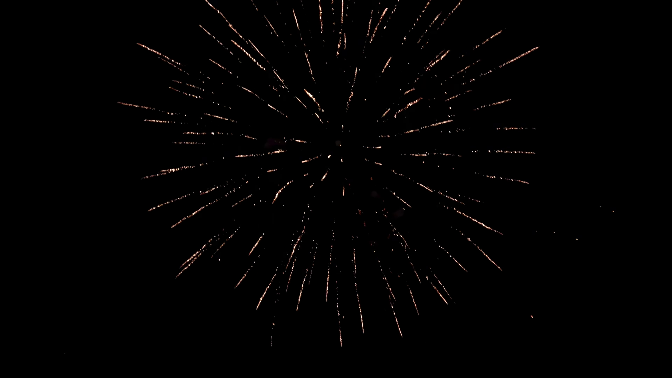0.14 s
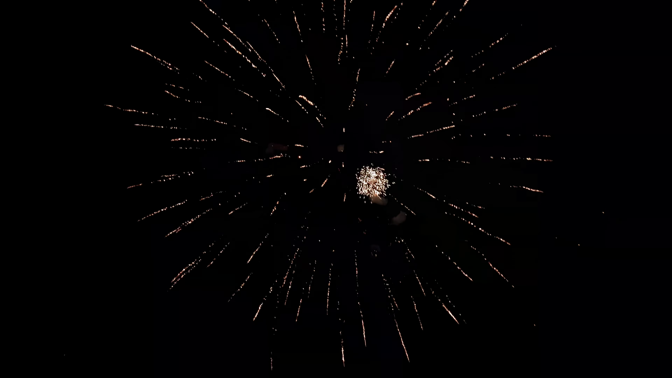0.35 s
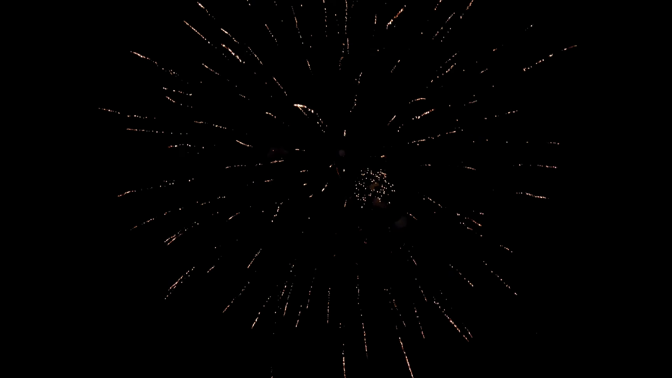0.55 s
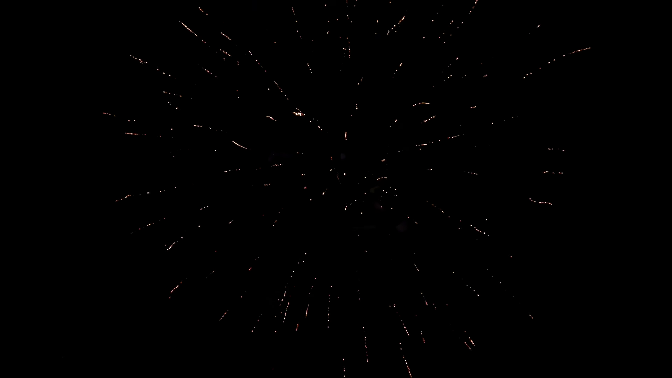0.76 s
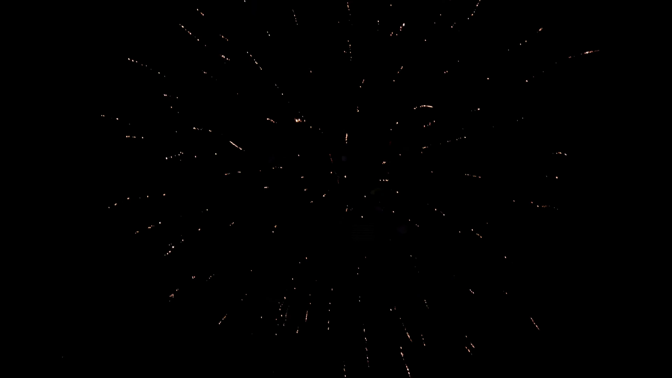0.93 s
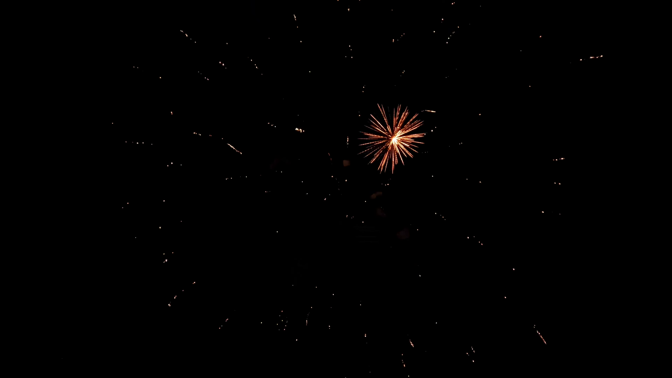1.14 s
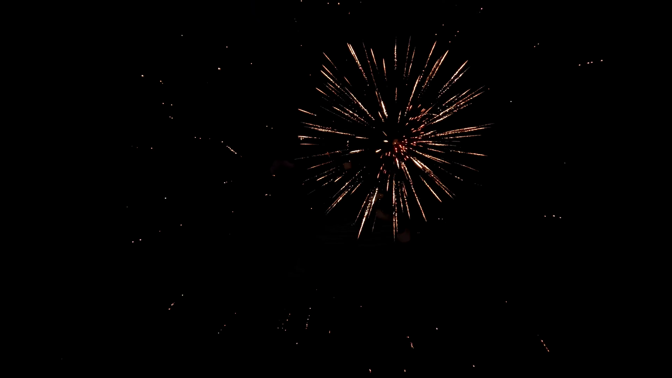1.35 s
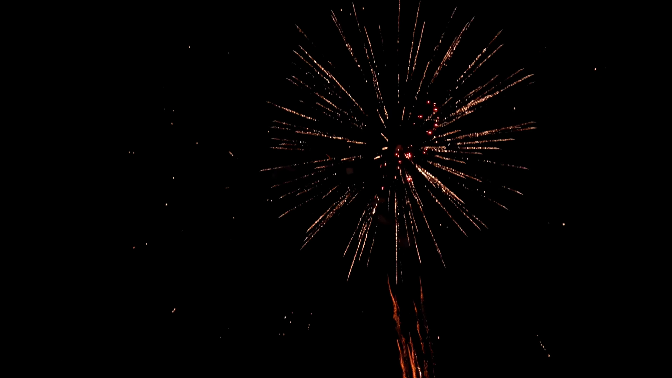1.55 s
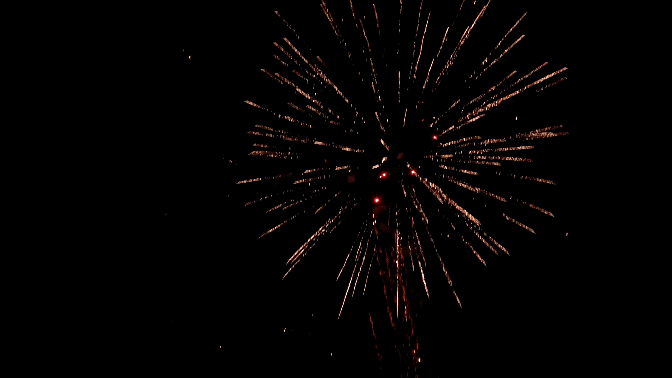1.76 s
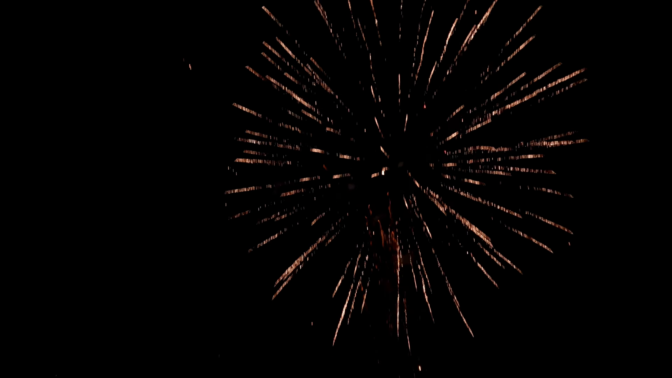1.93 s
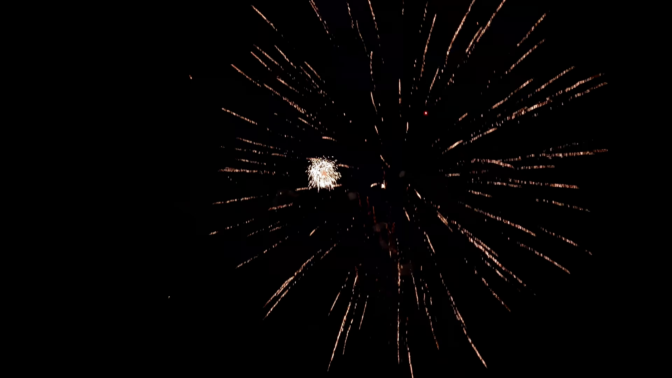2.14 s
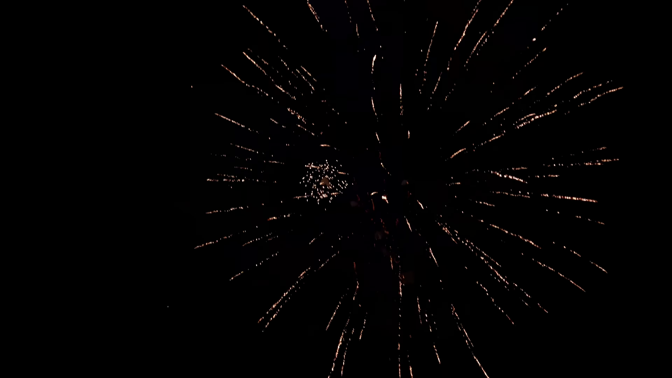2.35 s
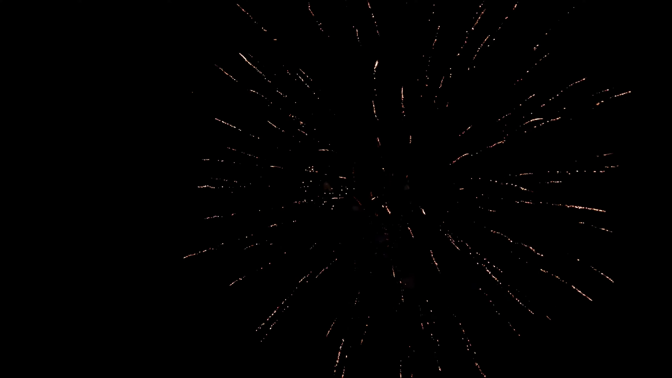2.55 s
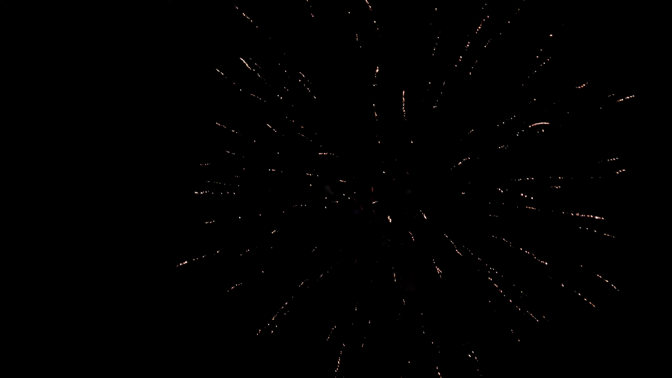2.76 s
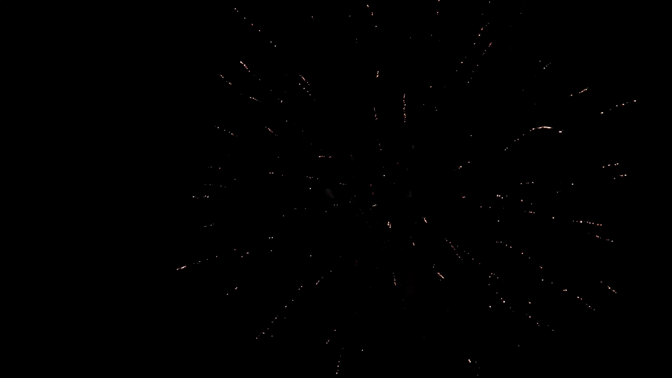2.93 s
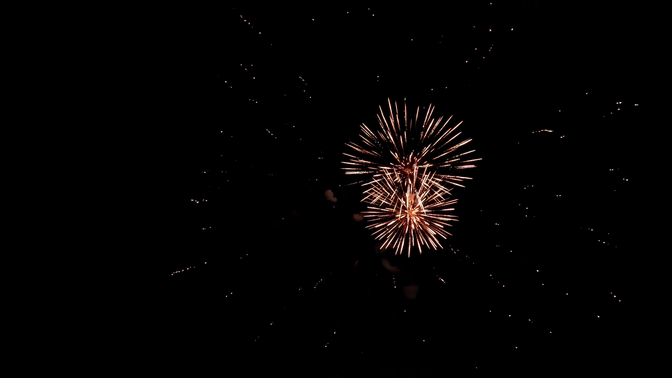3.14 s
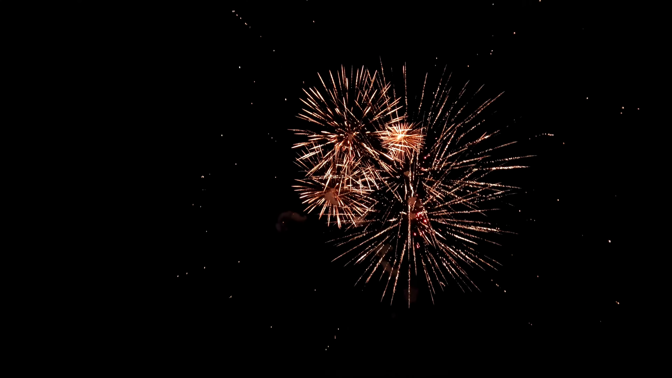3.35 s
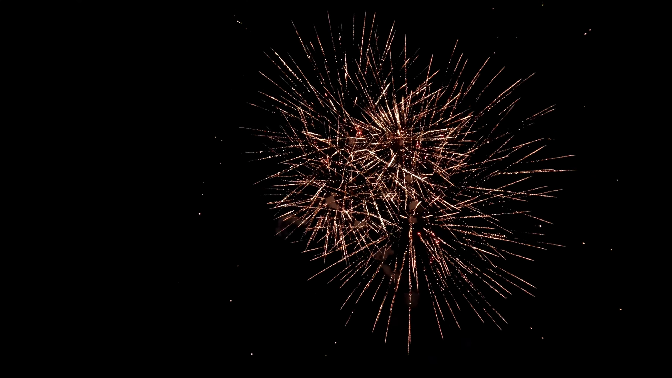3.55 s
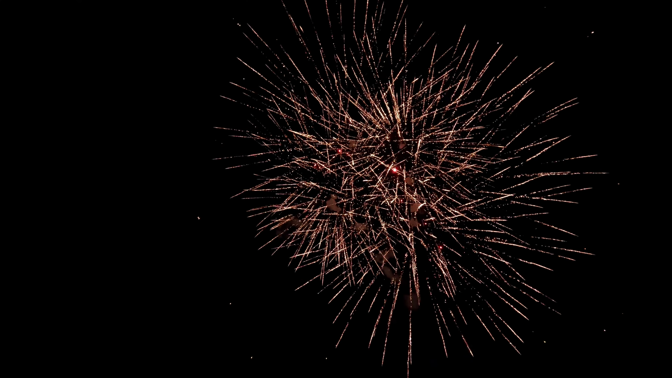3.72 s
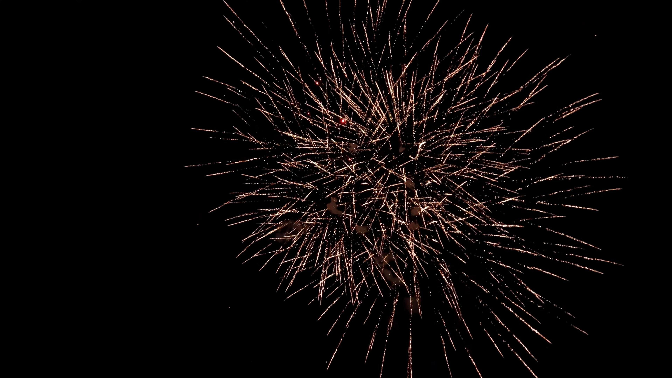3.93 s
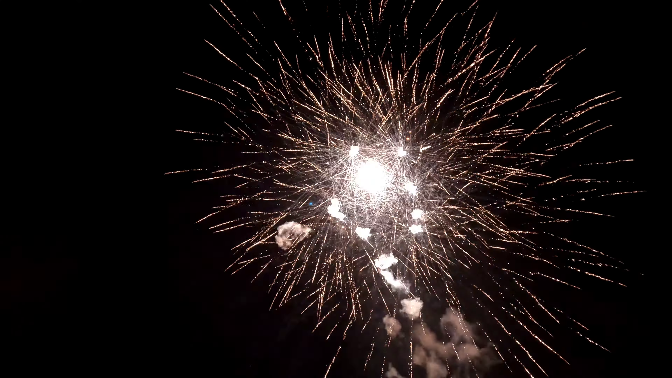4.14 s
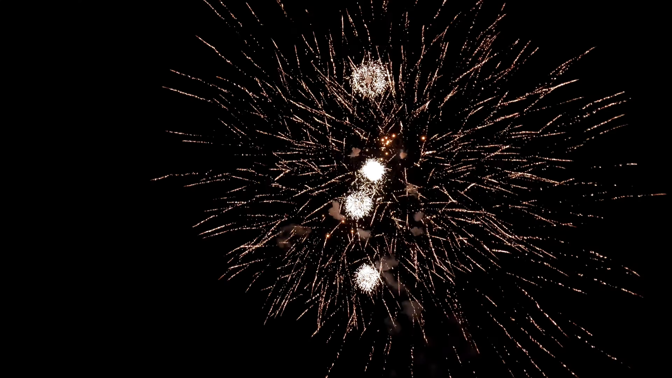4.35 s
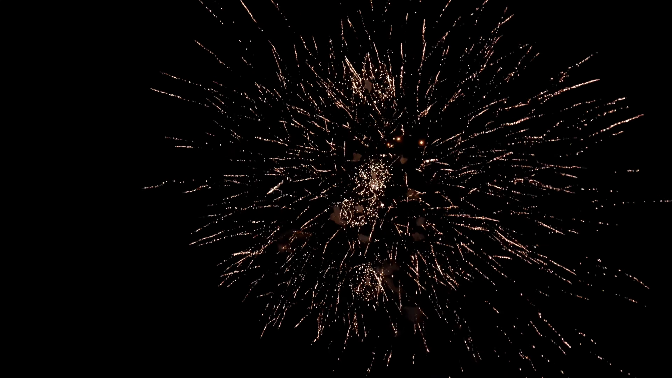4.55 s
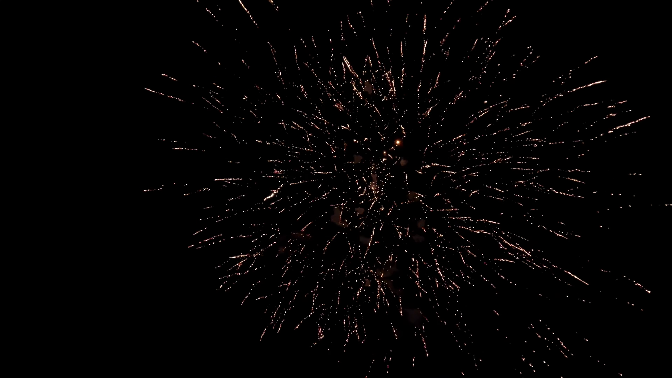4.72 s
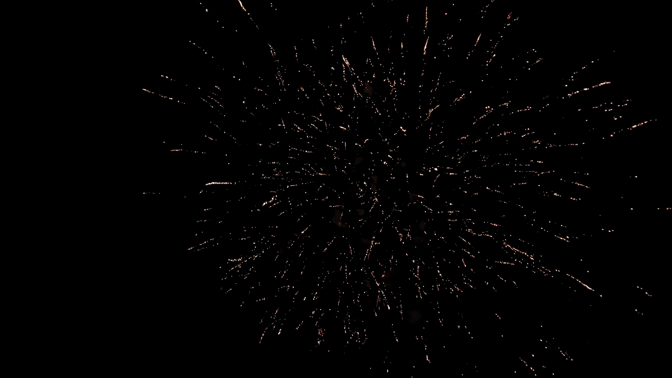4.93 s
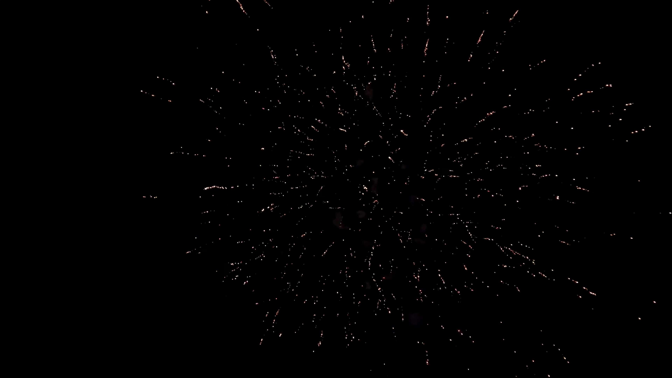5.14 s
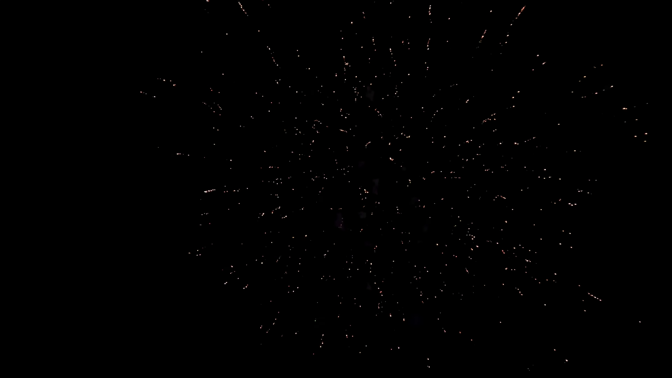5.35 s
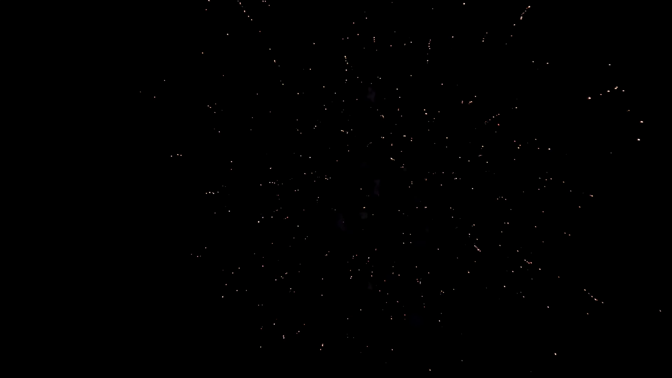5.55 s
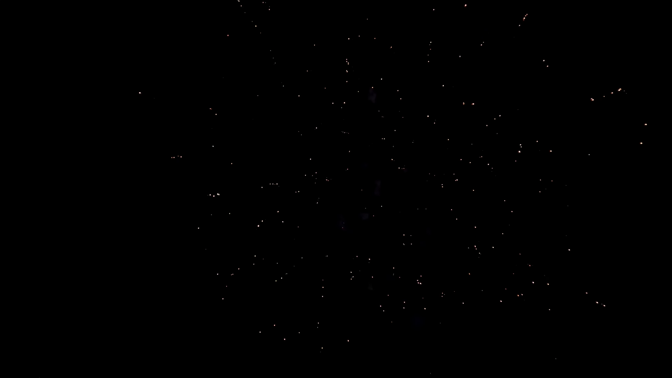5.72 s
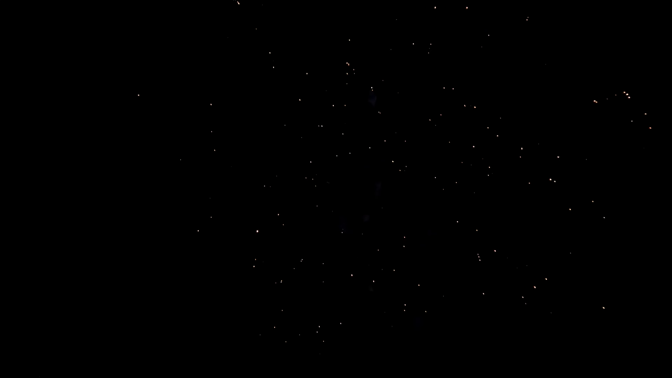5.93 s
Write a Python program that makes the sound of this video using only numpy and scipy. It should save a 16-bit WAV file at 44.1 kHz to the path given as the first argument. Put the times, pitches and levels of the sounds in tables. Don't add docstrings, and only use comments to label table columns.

```python
import sys
import numpy as np
from scipy import signal
from scipy.fft import rfft, irfft
from scipy.io import wavfile
from scipy.ndimage import uniform_filter1d, minimum_filter1d

SR = 44100
rng = np.random.default_rng(int(sys.argv[2]) if len(sys.argv) > 2 else 0)


def master_out(mix):
    frames = np.transpose(np.atleast_2d(mix))
    ceiling = np.clip(frames, -1, 1)
    pcm = np.round(ceiling * 32767).astype(np.int16)
    wavfile.write(sys.argv[1], SR, pcm)


def rack_gain(trim_db):
    fader = np.asarray(trim_db, float)
    return 10 ** (fader / 20)


N = 263894

# (time [s], blast level [dB], crack level [dB], size [factor], ground echo [dB])
SHELL_BURSTS = [(.6260, -4.5, 5.5, 1.04, -1), (1.5029, -5, -3, 1.03, 5.5), (1.5339, -8, 2.5, 1.18, -14),
                (2.4413, -2, -1.5, 1.024, 0), (3.3924, -1.5, -3, 0.85, -0.3), (3.449, -3.5, -8, 1.08, 0.5),
                (3.6310, -1, -12, 0.85, .1), (3.6773, -5.5, -3.5, 0.97, 4.5), (3.7316, -4, -23, 0.85, 3),
                (4.612, -1.5, -7.5, 0.93, 0), (4.617, -14.5, 14, 0.93, 12), (4.6914, -5.5, -9, 1.27, 5.5),
                (4.7560, -3.5, -19, 1.19, -9), (4.7618, -9.5, -5, 1.51, 4.5)]
# (time [s], thump level [dB], gas jet level [dB], jet lead [ms], wall echo [dB])
LIFT_CHARGES = [
    (1.4092, -8.5, -40, 3.1, -1),
    (1.4248, 0.5, -11.5, 6.9, -5),
    (1.4737, -2.5, -15.5, 1.1, -1),
    (1.533, -6.5, -18, 1.1, -0.5),
    (1.5847, -4, -15.5, 2.7, -0.5),
    (1.6334, -3, -16.5, 1.8, -1),
]
# (time [s], peak level [dB], treble re peak [dB], ring [Hz])
DISTANT_THUDS = [(0.048, -28.5, -30, 255), (0.496, -26.5, -26, 165), (0.79, -26, 0.5, 242),
                 (0.913, -19.5, -44, 223.5), (1.03, -25.5, -6, 222), (1.671, -18, -13, 167.5),
                 (2.474, -12, -11, 179), (2.49, -15, -18, 181), (2.51, -15, -15, 164),
                 (2.565, -19, -10, 185), (2.622, -20, -0.5, 227), (2.751, -28, -30, 226),
                 (2.937, -26.5, -38, 236), (2.987, -35, 3, 275), (3.044, -30.5, -5, 166),
                 (3.263, -25.5, -26, 188), (3.481, -16, -12, 220), (3.509, -13.5, -32, 182),
                 (3.599, -21, -2.5, 215), (3.848, -20.5, -7, 296), (3.883, -21.5, -7, 340),
                 (4.144, -27, -18, 246), (4.713, -15, -2, 203), (4.732, -19, -5, 200),
                 (4.786, -15.5, -9, 190), (5.308, -32.5, -21, 221), (5.531, -28, -9.5, 200),
                 (5.602, -34, -5, 152), (5.691, -31.5, -20, 153)]
# (time [s], peak level [dB], treble re peak [dB], ring [Hz])
FAR_TICKS = [(5.478, -34.5, -7, 2080), (5.824, -24, -31, 197), (5.825, -28.5, -28, 413),
             (5.843, -23.5, -34, 190), (5.884, -26, -26, 180), (5.886, -28, -29, 417),
             (5.918, -21, -14, 412), (5.933, -18.5, -19, 183), (5.937, -21, -29, 400),
             (5.944, -21, -25, 198), (5.963, -25, -12, 169), (5.981, -33, 0, 700)]
# (time [s], rumble level [dB], hiss level [dB], near yards [dB], far hills [dB])
SURROUNDINGS = [(-.4, -31.5, -37.5, 0, -7), (0.628, -27, -35, -1, -8), (1.424, -30, -34, 4, -24),
                (1.474, -29, -37, 5, -24), (1.533, -32, -38.5, 5, -24), (1.585, -33, -40, 8, -24),
                (1.632, -34, -42, 7, -22), (2.44, -27.5, -34.3, 0, -8), (3.393, -32, -41, 0, -8.5),
                (3.45, -30.5, -40.5, 2, -9), (3.63, -35.5, -42, -5, -7), (3.678, -34, -40.5, -3, -5.5),
                (3.731, -33.5, -38.5, -4, -5), (4.614, -31.5, -36, 1, -7.5), (4.691, -31.5, -41, 5, -7),
                (4.76, -29.5, -39.5, 7, -7)]
# (time [s], rumble level [dB], hiss level [dB], near yards [dB], far hills [dB])
FAR_ROLL = [
    (5.5, -41, -46, 0, -8),
    (5.8, -33, -46, 0, -8),
]
# (frequency [Hz], density [dB per Hz])
RUMBLE_SPECTRUM = [(18, -61), (30, -49.5), (71, -12), (227, 0.5), (290, -5.5), (468, -10.5), (513, -11.5),
                   (791, -33), (1200, -22.5), (1560, -52), (2640, -120)]
# (frequency [Hz], density [dB per Hz])
HISS_SPECTRUM = [(350, -13.5), (600, 1), (800, -3), (1340, -6.5), (1530, -4), (3400, -8), (4600, -14),
                 (5300, -20), (7900, -29.5), (9000, -40), (9600, -64), (10600, -38), (11400, -46),
                 (15000, -57)]
# (frequency [Hz], density [dB per Hz])
JET_SPECTRUM = [(600, 2), (1500, -6), (3000, 0), (4500, -7.5), (8000, -20.5), (14000, -37)]
# (frequency [Hz], density [dB per Hz])
LEAD_IN_SPECTRUM = [(100, -16), (300, 1), (700, 5), (2000, -18), (8000, -26.5), (9500, -55)]
# (frequency [Hz], gain [dB])
MICROPHONE_RESPONSE = [(30, -15), (100, -1), (150, 0), (5000, -1), (8000, -2), (9400, -18), (10600, -0.5),
                       (11600, -20), (14500, -8)]
# (frequency [Hz], side re mid [dB])
SIDE_SPECTRUM = [(60, -18), (250, -25), (700, -20), (2000, -18.5), (5000, -18), (9000, -6), (14000, -8)]

BLOCK = 4096
HZ = np.fft.rfftfreq(BLOCK, 1 / SR)
LEAD_IN_LENGTH = 1100
LIFT_LEAD_MS = 15
THUD_LEAD_S = .004
RUMBLE_SHAPE = dict(near_s=.008, near_db=4, near_fade_db=250, peak_s=.14, sharp=3,
                    hills_fade_db=7.5, floor_db=-47)
HISS_SHAPE = dict(near_s=.013, near_db=5, near_fade_db=160, peak_s=.1654, sharp=3,
                  hills_fade_db=7, floor_db=-51.5)
FAR_SHAPE = dict(near_s=0, near_db=-40, near_fade_db=250, peak_s=.16, sharp=2.2,
                 hills_fade_db=8, floor_db=-80)


def evened(x):
    return x / np.sqrt(np.mean(x ** 2) + 1e-20)


def add(mix, s, sound):
    part = mix[round(s * SR):][:len(sound)]
    part += sound[:len(part)]


def coloured(x, points):
    f, db = np.transpose(points)
    hz = np.fft.rfftfreq(len(x), 1 / SR)
    return irfft(rfft(x) * rack_gain(np.interp(np.log(hz + 1), np.log(f), db)), len(x))


def late(ms):
    return np.exp(-2j * np.pi * HZ * ms / 1000)


def dull(hz):
    return 1 / (1 + 1j * HZ / hz)


def answer(starts, levels_db, yards_db, hills_db, near_s, near_db, near_fade_db, peak_s, sharp,
           hills_fade_db, floor_db):
    t = np.arange(0, N + 64, 64) / SR
    age = np.maximum(t[:, None] - starts, 0)
    u = age / peak_s
    near = rack_gain(near_db + yards_db - near_fade_db * (age - near_s)) * (age > near_s)
    swell_power = (u * np.exp(1 - u)) ** sharp
    hills = rack_gain(hills_db - hills_fade_db * age)
    power = near ** 2 + swell_power + np.minimum(u, 1) * hills ** 2
    total = power @ rack_gain(levels_db) ** 2 + rack_gain(floor_db) ** 2
    return np.interp(np.arange(N) / SR, t, np.sqrt(total))


def scattered():
    s, rumble_db, hiss_db, *parts_db = np.transpose(SURROUNDINGS)
    far_s, far_rumble_db, far_hiss_db, *far_parts_db = np.transpose(FAR_ROLL)
    close = answer(s, hiss_db, *parts_db, **HISS_SHAPE)
    distant = answer(far_s, far_hiss_db, *far_parts_db, **FAR_SHAPE)
    rumble = np.hypot(answer(s, rumble_db, *parts_db, **RUMBLE_SHAPE),
                      answer(far_s, far_rumble_db, *far_parts_db, **FAR_SHAPE))

    returns = rng.standard_normal((2, N)) * rack_gain(0.99 * np.minimum(rng.exponential(1, (2, N)), 3))
    lumps = returns[0] * (rng.random(N) < 2500 / SR)
    grains = returns[1] * (rng.random(N) < 16000 / SR)
    flicker = evened(uniform_filter1d(rng.standard_normal(N), 500))
    slow_flicker = evened(uniform_filter1d(flicker, 2200))
    hiss = evened(coloured(grains, HISS_SPECTRUM)) * rack_gain(0.66 * flicker + 0.5 * slow_flicker)

    bright = rack_gain(0.75 + 0.39 * (np.minimum(20 * np.log10(close), -33) + 39))
    top = coloured(hiss, [(1500, -30), (4200, 0)])
    top_gain = np.hypot(close * bright, distant * rack_gain(-12))
    body = np.hypot(close, distant) * (hiss - top)
    return rumble * evened(coloured(lumps, RUMBLE_SPECTRUM)) + body + top_gain * top


def blast(size, top_hz, lag_hz=144, ring_hz=260, ring_q=2.62):
    w = 1j * HZ * size + 1e-9
    lag = ((w - lag_hz) / (w + lag_hz)) ** 4
    ring = w / (w * w + w * ring_hz / ring_q + ring_hz ** 2)
    step = lag * ring * dull(top_hz) * dull(top_hz)
    return step / abs(irfft(step)[60:]).max()


def thud(db, treble_db, hz):
    t = np.arange(BLOCK) / SR
    rattle = evened(coloured(rng.standard_normal(BLOCK), HISS_SPECTRUM))
    rattle = rattle * np.exp(-t / 0.0075) * (1 - np.exp(-t / 0.0034))
    boom = irfft(blast(250 / hz, 2.36 * hz, ring_q=12.3) * (1 + .5 * late(7.79)))
    return rack_gain(db) * (boom + rack_gain(treble_db + 1.5) * rattle)


def lead_in(db):
    t = np.arange(-LEAD_IN_LENGTH, 0) / SR
    noise = evened(coloured(rng.standard_normal(LEAD_IN_LENGTH), LEAD_IN_SPECTRUM))
    return rack_gain(db - 16.5) * np.exp(t / 0.0079) * noise


def burst(db, crack_db, size, ground_db, front_hz=1350, front_q=1.0):
    w = 1j * HZ
    ground_ms = 8.27 - 4.5 * max(size - 1.096, 0)
    front = w / (w * w + w * front_hz / front_q + front_hz ** 2) * dull(6200)
    front = rack_gain(crack_db) * front / irfft(front).max()

    n = np.arange(BLOCK)
    clutter = rng.standard_normal(BLOCK) * np.exp(-n / 130) * (n > 20)
    near = 1 + rack_gain(-5.0) * late(1.71) * dull(7000) + rack_gain(-8.0) * late(0.535)
    near = near + rack_gain(-17) * (late(ground_ms + .3) + late(20.3)) * dull(4000)
    near = near + rack_gain(-21) * rfft(clutter) * dull(5000) * (1 - dull(2070))

    rooftop = rack_gain(-6) * late(1.75) + rack_gain(-10) * late(3.1 * size)
    rooftop = rooftop * (1 - dull(1500)) * dull(3000 / size ** 3)
    ground = rack_gain(ground_db) * late(ground_ms) * dull(220)
    boom = blast(size, 6900) * (1 + rack_gain(-9) * late(1.447) + ground + rooftop)
    return rack_gain(db) * irfft(boom + front * near)


def lift(db, jet_db, lead_ms, wall_db, wall_ms=13.15):
    t = np.arange(BLOCK) / SR - LIFT_LEAD_MS / 1000
    swell = np.exp(np.minimum((t + lead_ms / 1000) / .0018, 0))
    swell = swell * np.exp(-np.maximum(t - .001, 0) / .002)
    sputter = evened(uniform_filter1d(rng.standard_normal(BLOCK), size=40))
    swell = swell * rack_gain(4.95 * sputter)
    gas = evened(coloured(rng.standard_normal(BLOCK), JET_SPECTRUM))
    jet = rack_gain(jet_db) * rfft(swell * gas)
    jet_walls = (rack_gain(wall_db - 4) * late(wall_ms + 2.5) + rack_gain(wall_db - 8) * late(28.5)) * dull(3500)
    thump = rack_gain(db) * dull(924) * blast(.92, 450, ring_hz=298, ring_q=1.04) * late(LIFT_LEAD_MS)
    return irfft(thump * (1 + rack_gain(wall_db) * late(wall_ms)) + jet * (1 + jet_walls))


def yard_tail(shots):
    t = np.arange(6000) / SR
    yard = rng.standard_normal(6000) * (t > .018) * rack_gain(-60 * t / 0.32)
    yard = coloured(yard / np.linalg.norm(yard), [(300, 2), (3000, -19.0), (7000, 3), (9000, -22.0)])
    return rack_gain(-10.5) * signal.oaconvolve(shots, yard)[:N]


def difference(mid):
    hz, t, z = signal.stft(mid, SR, nperseg=1024)
    turn, chance = rng.random((2, len(t), len(hz))).transpose(0, 2, 1)
    drift = evened(uniform_filter1d(rng.standard_normal(len(t)), max(round(.045 / t[1]), 1)))
    loud_db = 10 * np.log10((abs(z) ** 2).sum(0) + 1e-12)
    loud_db = loud_db - np.median(loud_db)
    bass_rarer = .8 * (hz < 450)[:, None]
    gain = rack_gain(2.5) * (drift + loud_db / 22 > bass_rarer + .15)
    patches = uniform_filter1d(uniform_filter1d(chance - .5, size=6, axis=0), size=3, axis=1)
    kept = evened(patches) > .25 - hz[:, None] / 9000
    side = signal.istft(z * gain * kept * np.exp(2j * np.pi * turn), SR, nperseg=1024)[1][:N]
    return coloured(side, SIDE_SPECTRUM)


def thinned_treble(x, floor_db=-53, follow=0.5):
    hz, t, z = signal.stft(x, SR, nperseg=1024)
    power = (abs(z) ** 2).mean(0)
    masking = np.median(power[(hz > 1500) & (hz < 5000)], axis=0)
    masking = minimum_filter1d(masking, size=4) ** follow
    audible = uniform_filter1d(power, size=5, axis=0) > rack_gain(2 * floor_db) * masking
    kept = audible | (hz < 7100)[:, None]
    return signal.istft(z * kept, SR, nperseg=1024)[1][:, :N]


def scene():
    shots, far = np.zeros(N), scattered()
    for s, *row in DISTANT_THUDS:
        add(far, s - THUD_LEAD_S, thud(*row))
    for s, db, crack_db, *row in SHELL_BURSTS:
        add(far, s - LEAD_IN_LENGTH / SR, lead_in(db + max(crack_db, -4)))
        add(shots, s, burst(db, crack_db, *row))
        add(far, s + .028, thud(db - 17.5, -13, 190))
    for s, *row in LIFT_CHARGES:
        add(shots, s - LIFT_LEAD_MS / 1000, lift(*row))
    for s, *row in FAR_TICKS:
        add(far, s, thud(*row))
    shots = coloured(shots, MICROPHONE_RESPONSE)
    mid = shots + far + yard_tail(shots)
    side = difference(mid)
    return np.array([mid + side, mid - side])


def top_cut(x):
    return signal.sosfilt(signal.butter(12, 15260, fs=SR, output="sos"), x)


def record(dry):
    power_db = 10 * np.log10(abs(uniform_filter1d((dry ** 2).mean(0), 200)) + 1e-12)
    fall = np.arange(N) * 135.0 / SR
    held_db = np.maximum.accumulate(power_db + fall) - fall
    over_db = np.maximum(held_db + 14, 0)
    treble = signal.sosfiltfilt(signal.butter(2, 1000, "high", fs=SR, output="sos"), dry)
    duck = np.roll(rack_gain(-.4 * uniform_filter1d(over_db, 100)), 200)
    x = np.clip(dry + treble * (duck - 1), -.95, .95)
    band_limit = signal.firwin(511, 15100, window=("kaiser", 9), fs=SR)
    x = signal.oaconvolve(x, band_limit[None], "same")
    mix = thinned_treble(x)
    return top_cut(mix)


dry = scene()
out = record(dry)
master_out(out)
```